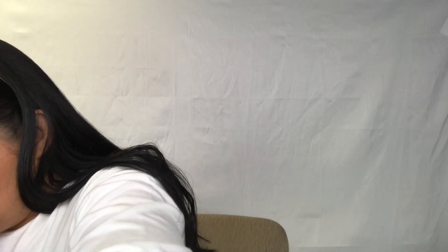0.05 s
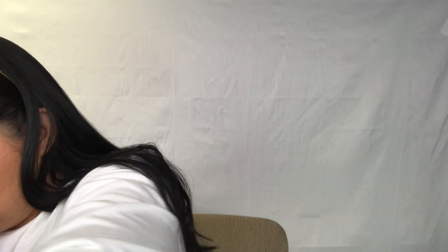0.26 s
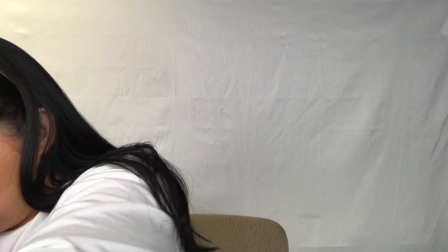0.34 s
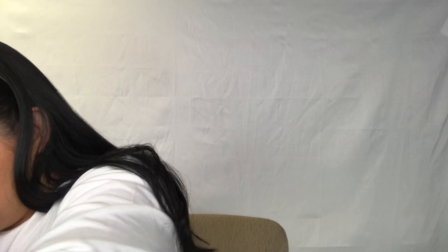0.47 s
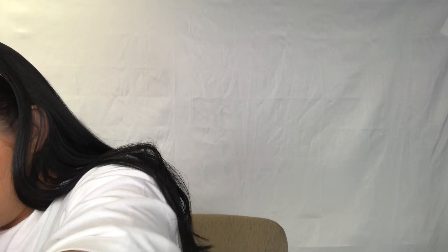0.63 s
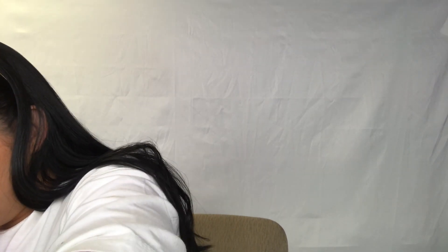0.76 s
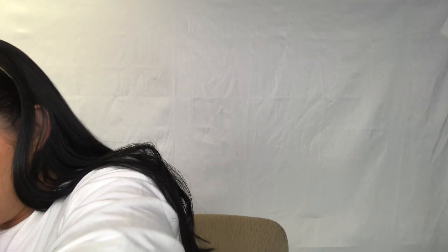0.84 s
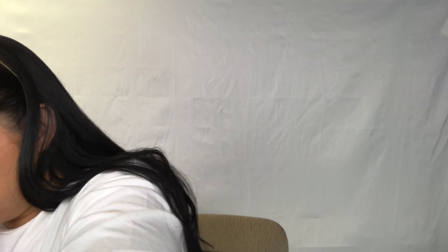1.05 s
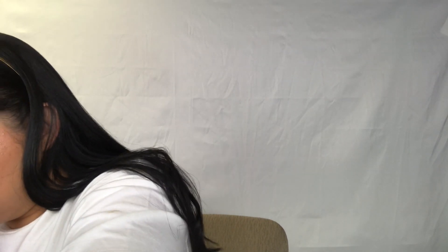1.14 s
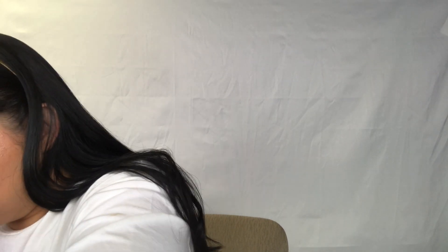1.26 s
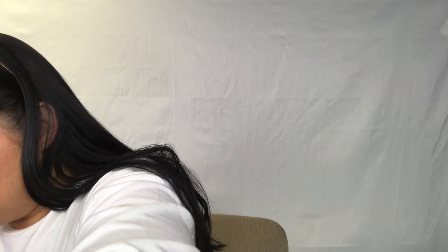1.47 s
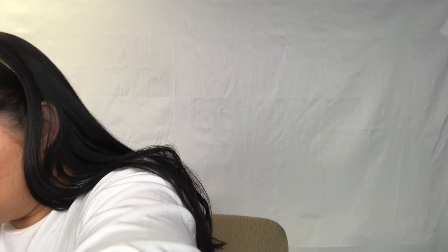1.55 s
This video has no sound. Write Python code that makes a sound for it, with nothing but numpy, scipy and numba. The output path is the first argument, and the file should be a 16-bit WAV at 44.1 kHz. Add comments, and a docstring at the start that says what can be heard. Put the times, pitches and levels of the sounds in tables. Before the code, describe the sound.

Plastic makeup cases are rummaged through in a tray: faint shuffling and low room hiss, then a dense cluster of hollow clacks and bumps at 0.24-0.35 s. A box scuffs and scrapes from 0.45 s, catching and knocking to a stop by 0.57 s. Cases knock again around 0.79-0.87 s. A jar bumps softly near 1.0 s and sets down at 1.2 s, with faint clicks until 1.4 s. Quick room flutter.

```python
"""Small plastic makeup cases are rummaged through in a tray, in a small bare room.
Over faint shuffling (random nudges) and hiss (coloured noise), cases clack and bump the tray: noise bursts plus modes.
Brief rattles follow; a hollow box scuffs, scrapes by stick-slip, catches and hits its stop; the cases knock again.
Last a jar is bumped and set down softly, its modes driven by cushioned pulses, among a few small clacks.
Two facing walls return every click as a quick flutter, with a diffuse tail."""
import sys
import numpy as np
from scipy import signal
from scipy.fft import rfft, irfft
from scipy.io import wavfile
from numba import njit

SR = 44100
rng = np.random.default_rng(int(sys.argv[2]) if len(sys.argv) > 2 else 0)


def pcm_store(signal):
    """Save signal as 16-bit PCM."""
    levels = np.round(np.clip(np.atleast_2d(signal), -1, 1) * 32767)
    wavfile.write(sys.argv[1], SR, levels.astype(np.int16).T)


N = 70560
T = np.arange(N) / SR

# Cases knocking: (time [s], tray boom [dB], hollow case [dB], shell clack [dB], clack centre [Hz],
# clack width [share of centre], edge tick [dB])
CASE_KNOCKS = [(0.000, -40, -30, -53, 1290, 1.1, -62), (0.008, -58, -37.5, -41.5, 1390, 0.89, -54),
               (0.2434, -54, -59, -43.5, 4250, 0.14, -44), (0.2444, -38, -22, -22, 2290, 0.34, -51),
               (0.2649, -48, -19, -58, 2400, 0.34, -51), (0.2726, -24.5, -32, -29.5, 2180, 0.19, -30),
               (0.2862, -24.5, -16, -22.5, 2130, 0.27, -30), (0.2927, -18.5, -22, -30.5, 2080, 1, -44.5),
               (0.3030, -23, -14, -25.5, 1065, 0.26, -52), (0.3113, -28, -27, -35, 2040, 0.2, -66),
               (0.334, -17, -38, -70, 2200, 0.55, -70), (0.3538, -58, -37, -46.5, 2300, 0.53, -43),
               (0.4180, -38.5, -31.5, -49.5, 1960, 0.57, -63), (0.7918, -25, -31.5, -30, 2230, 0.16, -63),
               (0.795, -18.5, -21, -62.5, 1100, 0.9, -62), (0.836, -19.5, -28.5, -76, 2130, 0.52, -68),
               (0.871, -27.5, -29.5, -36, 1600, 0.6, -87), (0.9989, -54, -55, -40, 694, 0.65, -62),
               (1.093, -62, -74, -51, 1180, 0.067, -58.5), (1.2030, -58, -37, -42.5, 980, 0.99, -73),
               (1.254, -62, -66, -49.5, 2750, 0.35, -74), (1.402, -51, -42.5, -49, 2560, 0.11, -61)]
# Modes of the tray: (frequency [Hz], level [dB], t60 [s])
TRAY_MODES = [(144.4, -18.5, 0.47), (197.1, -1, 0.23), (234, -10.5, 0.21), (264.7, 0.5, 0.21),
              (313.4, -7.5, 0.13), (435.7, -12.5, .18), (476, -8, 0.096), (580, -9.5, 0.17)]
# Modes of a hollow case: (frequency [Hz], level [dB], t60 [s])
HOLLOW_MODES = [(339, -6.5, 0.096), (406, 3, 0.067), (520, 0.5, 0.025), (625, -5, .05), (730, -0.5, 0.018),
                (1004, -12, 0.052), (1130, -16, 0.088)]
# Spectrum of an edge tick: (frequency [Hz], level [dB])
TICK_SPECTRUM = [(1000, 2), (3600, -15), (4400, 4.5), (5600, 4.5), (6900, 4.5), (7900, -6.5), (8700, -11),
                 (15800, -33)]
# Slides of the box and brief rattles among the knocks:
# (start of full level [s], hold [s], box [dB], scratch [dB])
SLIDES_AND_RATTLES = [(0.284, 0.02, -36, -36.5), (0.45, 0.0087, -29.5, -44), (0.465, 0.045, -15, -20.5),
                      (0.686, 0.056, -41, -55.5), (0.773, 0.022, -40, -50)]
# Box catching on the way and hitting its stop: (time [s], box [dB], scratch [dB])
BOX_CATCHES = [(0.4675, -15, -17.5), (0.4722, -14.5, -25.5), (0.4891, -30, -9), (0.4932, -21.5, -12),
               (0.508, -25, -12.5), (0.509, -29, -23.5), (0.528, -11.5, -46), (0.5570, -8, -22),
               (0.5658, -8, -22.5)]
# Modes of the sliding box: (frequency [Hz], level [dB], t60 [s])
BOX_MODES = [(334, -9.5, 0.033), (456.5, -4, 0.048), (515.4, -3, 0.066), (635, -2.5, 0.045),
             (735, -4.5, 0.055), (783, -4, 0.028), (861.5, -6.5, 0.045), (980, -3.5, 0.06),
             (1049, -2.5, 0.023), (1094, -1, 0.037), (1208, -0.5, 0.013), (1860, -7.5, 0.014),
             (2093, -11.5, 0.021), (2340, -8.5, 0.012)]
# Spectrum of the box edge scratching: (frequency [Hz], level [dB])
SCRATCH_SPECTRUM = [(150, 1), (300, -1), (700, 13.5), (1200, 7.5), (1450, -5.5), (2300, 4), (3100, -2.5),
                    (3650, -21.5), (4100, -5), (4650, -1), (5200, -11.5), (5900, -4), (7000, -10.5),
                    (9000, -10), (10300, -19), (11300, -12), (15800, -24)]
# Jar bumped and set down: (time [s], level [dB], contact [s])
JAR_CONTACTS = [(0.997, -31.5, 0.0083), (1.2056, -14.5, .0011), (1.2554, -37, 0.0023),
                (1.3700, -34, 0.0024)]
# Modes of the jar: (frequency [Hz], level [dB], t60 [s])
JAR_MODES = [(164.3, -6.5, 0.092), (224.4, -3.5, 0.11), (259, -1, 0.043), (357.6, -9.5, 0.11),
             (480, 1.5, 0.021), (611, 4.5, 0.051), (623, -15, 0.27), (665, -1, 0.038), (779, -3.5, 0.066),
             (904, -8.5, 0.03)]
# Spectrum of the diffuse tail: (frequency [Hz], level [dB])
TAIL_SPECTRUM = [(100, -4), (250, 0), (600, -6.5), (1200, 3.5), (2500, -4), (6000, -0.5), (14000, -21)]
# Decay of the diffuse tail: (frequency [Hz], t60 [s])
TAIL_DECAY = [(150, 0.49), (600, 0.18), (2000, 0.21), (6000, 0.17), (14000, 0.26)]
# Spectrum of the room hiss: (frequency [Hz], level [dB])
HISS_SPECTRUM = [(25, -26), (50, -11), (80, 3), (150, -1), (300, -5), (600, -2), (1100, -14.5),
                 (1800, -18.5), (2600, -21), (3800, -24.5), (6500, -24.5), (9000, -31), (15800, -34.5)]

CRACK_RISE_S, CLACK_T60_S, TICK_T60_S, SCRATCH_T60_S = 0.0006, 0.013, 0.01, 0.0082
SHUFFLES_PER_S, SHUFFLE_SCATTER_DB = 200, 4
SHUFFLE_TRAY_DB, SHUFFLE_HOLLOW_DB, SHUFFLE_SHELL_DB = -56.5, -61, -62
SHUFFLE_CLACK_HZ, SHUFFLE_CLACK_WIDTH = 2460, 0.35  # width as a share of the centre
HISS_DB = -44.5
SLIPS_PER_S, SLIP_SCATTER_DB = 1500, 2.5
SLIP_ATTACK_S, SLIP_RELEASE_S = 0.0045, 0.027
BOX_TRAY_DB = -20  # share of each catch that booms in the tray
SCUFF_S, SCUFF_WIDTH_S, SCUFF_HZ, SCUFF_SPREAD_HZ, SCUFF_DB = 0.447, 0.0049, 2690, 750, -32
LOW_CUT_HZ, TOP_HZ = 115, 15800
FLUTTER_S, FLUTTER_DB, FLUTTER_LOSS_DB = 0.0168, -6, 4.5  # period, first echo, loss per echo
FLUTTER_LOW_HZ = 1270  # the echoes keep only what lies above this
TAIL_ONSET_S = 0.0026
KNEE_DB, SQUEEZE, GAIN_ATTACK_S, GAIN_RELEASE_S = -23.5, 0.13, 0.0014, 0.15
CEILING = 0.9


def amp(db):
    """Decibels to gain."""
    return 10 ** (np.asarray(db) / 20)


def level(x, db):
    """Set the rms level."""
    return x * amp(db) / np.sqrt(np.mean(x ** 2) + 1e-18)


def unit_energy(x):
    """Scale to the energy of 10 ms at full level."""
    return x / np.sqrt(np.sum(x ** 2) / (SR / 100))


def at_hz(points, hz):
    """Read (Hz, value) points on a log-frequency axis."""
    f, v = np.array(points, float).T
    return np.interp(np.log(np.maximum(hz, 1)), np.log(f), v)


def colour(x, points):
    """Filter by a (Hz, dB) spectrum, minimum phase by way of the folded cepstrum."""
    size = 2 * N
    gain = amp(at_hz(points, np.arange(N + 1) * SR / size))
    cepstrum = irfft(np.log(gain))
    cepstrum[1:N] *= 2
    cepstrum[N + 1:] = 0
    return irfft(rfft(x, size) * np.exp(rfft(cepstrum)))[:N]


def through(x, response):
    """Convolve an excitation with a response."""
    return signal.fftconvolve(x, response)[:N]


def highpass(x, order, hz):
    """Butterworth low cut."""
    return signal.sosfilt(signal.butter(order, hz, "high", fs=SR, output="sos"), x)


def taps(times, db):
    """One impulse for each contact."""
    out = np.zeros(N)
    index = np.round(np.asarray(times) * SR).astype(int)
    np.add.at(out, np.clip(index, 0, N - 1), amp(db))
    return out


def random_taps(rate, scatter_db):
    """Irregular contacts of uneven strength and either direction."""
    hit = rng.random(N) < rate / SR
    strength = amp(scatter_db * np.clip(rng.standard_normal(N), -2, 2))
    return hit * strength * rng.choice([-1, 1], N)


def ring(modes):
    """Decaying modes of a struck body; neighbouring modes swing in opposite directions."""
    total = np.zeros(N)
    for k, (hz, db, t60) in enumerate(modes):
        total += (-1) ** k * amp(db - 60 * T / t60) * np.sin(2 * np.pi * hz * T)
    return unit_energy(total)


def cracks(contacts, t60):
    """A fresh, brief burst of noise for each contact."""
    fade = unit_energy(np.exp(-np.log(1000) * T / t60) * (1 - np.exp(-T / CRACK_RISE_S)))
    power = np.maximum(through(contacts ** 2, fade ** 2), 0)
    return rng.standard_normal(N) * np.sqrt(power)


def tint(x, points):
    """Colour a noise and keep its power."""
    response = colour(taps([0], [0]), points)
    return through(x, level(response, 0) / np.sqrt(N))


def clack(contacts, hz, width):
    """A stiff little shell rings in one broad, quickly damped resonance."""
    edges = np.clip([hz / (1 + width / 2), hz * (1 + width / 2)], 50, 15000)
    band = signal.butter(2, edges, "band", fs=SR, output="sos")
    return unit_energy(signal.sosfilt(band, cracks(contacts, CLACK_T60_S)))


def cases():
    """Each knock clacks a shell, ticks an edge, and rings the hollow case and the tray under it."""
    times, tray, hollow, shell, centre, width, edge = np.array(CASE_KNOCKS).T
    out = through(taps(times, tray), ring(TRAY_MODES))
    out += through(taps(times, hollow), ring(HOLLOW_MODES))
    out += tint(cracks(taps(times, edge), TICK_T60_S), TICK_SPECTRUM)
    for time, db, hz, w in zip(times, shell, centre, width):
        out += amp(db) * clack(taps([time], [0]), hz, w)
    return out


def shuffling():
    """Many faint nudges ring tray and cases and clack shells."""
    nudges = random_taps(SHUFFLES_PER_S, SHUFFLE_SCATTER_DB)
    tray = level(through(nudges, ring(TRAY_MODES)), SHUFFLE_TRAY_DB)
    hollow = level(through(nudges, ring(HOLLOW_MODES)), SHUFFLE_HOLLOW_DB)
    shells = level(clack(nudges, SHUFFLE_CLACK_HZ, SHUFFLE_CLACK_WIDTH), SHUFFLE_SHELL_DB)
    return tray + hollow + shells


def hiss():
    """Steady room hiss: coloured noise."""
    return level(colour(rng.standard_normal(N), HISS_SPECTRUM), HISS_DB)


def slides_and_rattles():
    """Irregular slips ring the box and scratch its edge; hard catches also boom in the tray."""
    times, box, scratch = np.array(BOX_CATCHES).T
    body, edge = taps(times, box), taps(times, scratch)
    # scaled to unit rms once rung by a unit-energy response
    slips = level(random_taps(SLIPS_PER_S, SLIP_SCATTER_DB), 0) / np.sqrt(SR / 100)
    for start, hold, box_db, scratch_db in SLIDES_AND_RATTLES:
        rise = np.minimum(T - start, 0) / SLIP_ATTACK_S
        fall = np.maximum(T - start - hold, 0) / SLIP_RELEASE_S
        swell = np.exp(rise - fall)
        body += slips * swell * amp(box_db)
        edge += slips * swell * amp(scratch_db)
    boom = through(taps(times, box + BOX_TRAY_DB), ring(TRAY_MODES))
    scrape = tint(cracks(edge, SCRATCH_T60_S), SCRATCH_SPECTRUM)
    return through(body, ring(BOX_MODES)) + boom + scrape


def scuff():
    """Plastic rubs for a few milliseconds as the box breaks loose: a brief band of noise."""
    hz = np.arange(N // 2 + 1) * SR / N
    band = np.exp(-0.5 * ((hz - SCUFF_HZ) / SCUFF_SPREAD_HZ) ** 2)
    rub = irfft(rfft(rng.standard_normal(N)) * band, N)
    return level(rub, SCUFF_DB) * np.exp(-abs(T - SCUFF_S) / SCUFF_WIDTH_S)


def jar():
    """Cushioned contacts give hollow knocks; the longer the contact, the duller the knock."""
    modes, out = ring(JAR_MODES), np.zeros(N)
    for time, db, contact_s in JAR_CONTACTS:
        force = np.sin(np.pi * np.minimum(T / contact_s, 1)) ** 2
        out += through(taps([time], [db]), unit_energy(through(force, modes)))
    return out


def wall_flutter():
    """Evenly spaced, fading echoes between two facing walls, without lows."""
    rounds = np.arange(10)
    echoes = taps(FLUTTER_S * (rounds + 1), FLUTTER_DB - FLUTTER_LOSS_DB * rounds)
    return highpass(echoes, 2, FLUTTER_LOW_HZ)


def diffuse_tail():
    """Noise that builds quickly, then decays at its own rate in each octave band."""
    octave = np.log2(np.clip(np.arange(N // 2 + 1) * SR / N, 125, 16000) / 125)
    noise, tail = rfft(rng.standard_normal(N)), np.zeros(N)
    for k, hz in enumerate(125 * 2 ** np.arange(8)):
        onset = 1 - np.exp(-(T / TAIL_ONSET_S) ** 2)
        fade = onset * np.exp(-np.log(1000) * T / at_hz(TAIL_DECAY, hz))
        band = irfft(noise * np.maximum(1 - abs(octave - k), 0), N)
        tail += band * fade / np.sqrt(np.sum(fade ** 2)) * amp(at_hz(TAIL_SPECTRUM, hz))
    return tail


def room(x):
    """Direct sound plus wall flutter and diffuse tail."""
    return x + through(x, wall_flutter() + diffuse_tail())


def scene():
    """All handling in the room, over its steady hiss."""
    handling = cases() + shuffling() + slides_and_rattles() + scuff() + jar()
    return (room(highpass(handling, 3, LOW_CUT_HZ)) + hiss())[None]


@njit
def follow(x, attack, release):
    """Track the level, fast up and slowly down."""
    out, e = np.empty(len(x)), 0.
    for i in range(len(x)):
        e += (abs(x[i]) - e) * (attack if abs(x[i]) > e else release)
        out[i] = e
    return out


def record(dry):
    """Automatic gain turns loud moments down a little; the highest peaks are rounded, the top cut."""
    loud = follow(dry[0], 1 / (GAIN_ATTACK_S * SR), 1 / (GAIN_RELEASE_S * SR))
    held = dry * np.maximum(loud / amp(KNEE_DB), 1) ** -SQUEEZE
    rounded = held / (1 + (held / CEILING) ** 6) ** (1 / 6)
    return signal.sosfilt(signal.ellip(12, 0.2, 90, TOP_HZ, fs=SR, output="sos"), rounded)


dry = scene()
out = record(dry)
pcm_store(out)
```